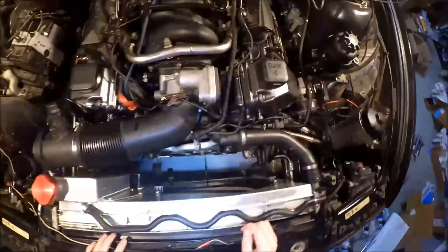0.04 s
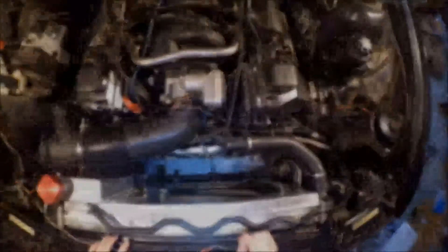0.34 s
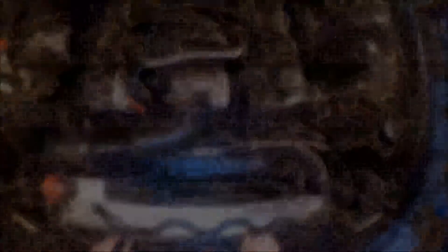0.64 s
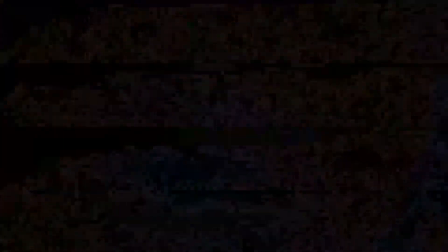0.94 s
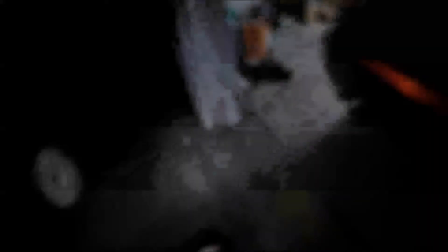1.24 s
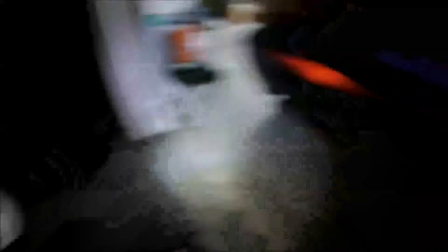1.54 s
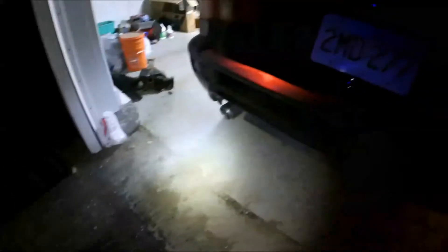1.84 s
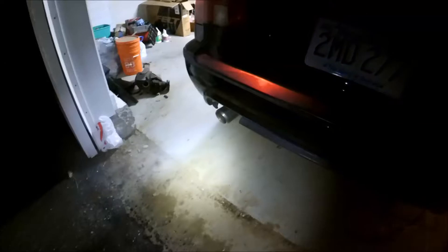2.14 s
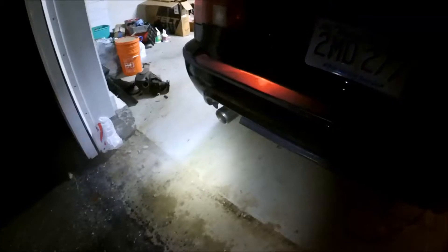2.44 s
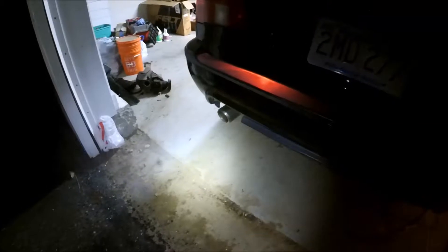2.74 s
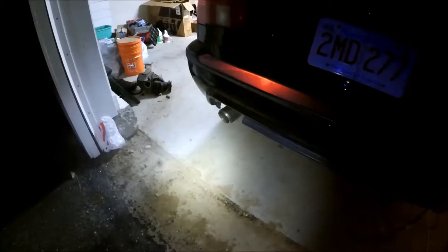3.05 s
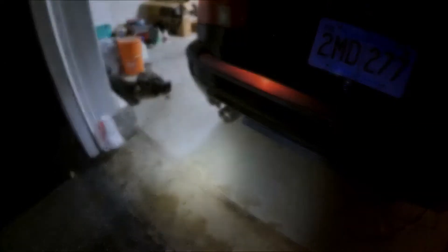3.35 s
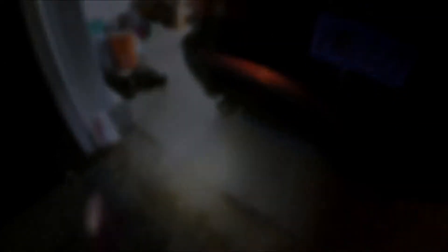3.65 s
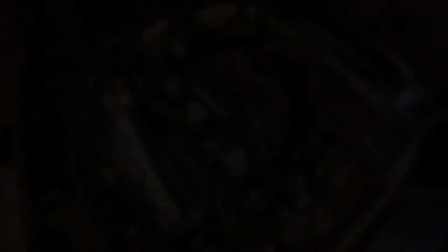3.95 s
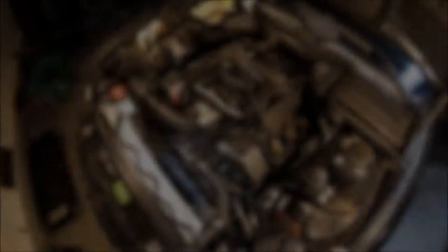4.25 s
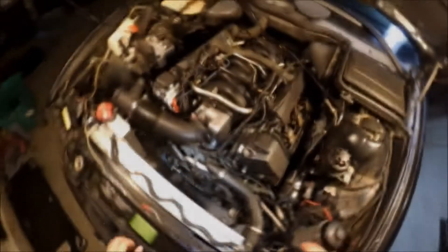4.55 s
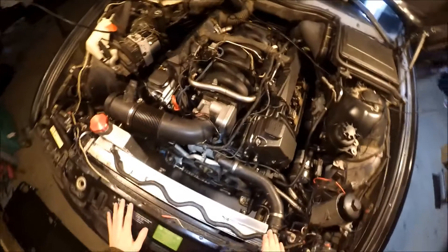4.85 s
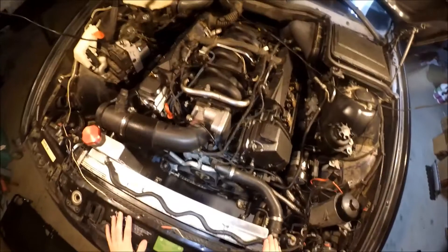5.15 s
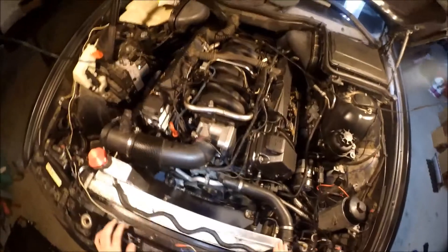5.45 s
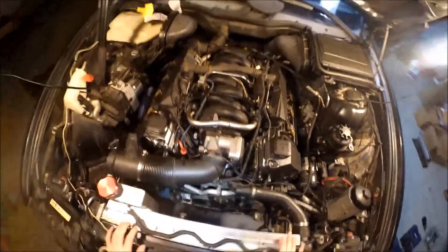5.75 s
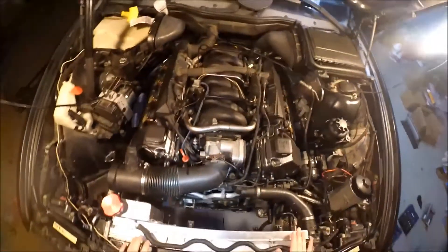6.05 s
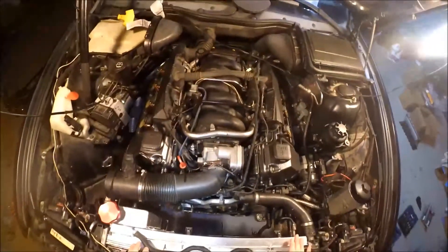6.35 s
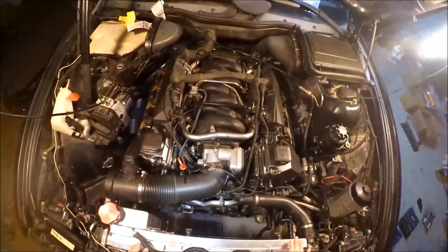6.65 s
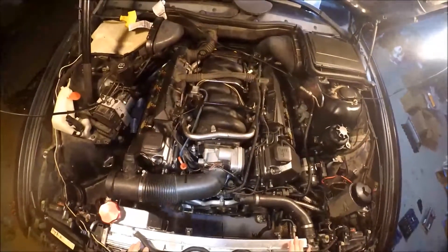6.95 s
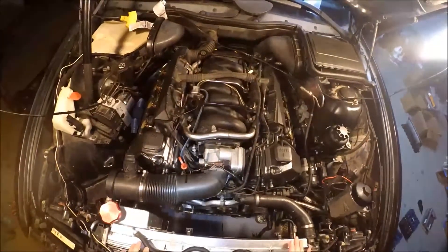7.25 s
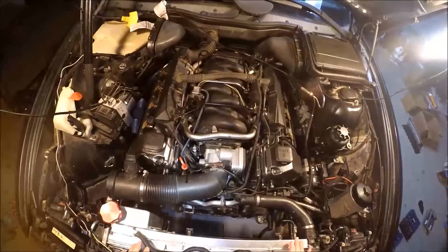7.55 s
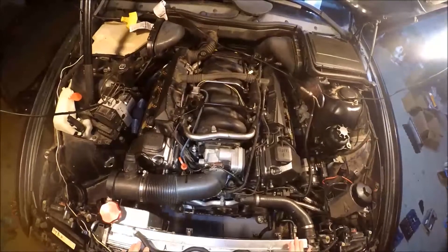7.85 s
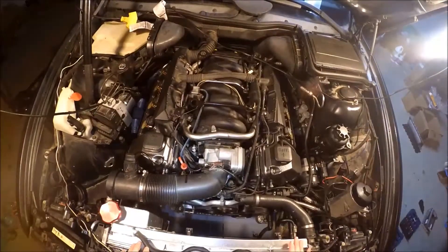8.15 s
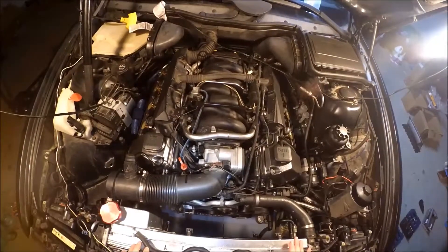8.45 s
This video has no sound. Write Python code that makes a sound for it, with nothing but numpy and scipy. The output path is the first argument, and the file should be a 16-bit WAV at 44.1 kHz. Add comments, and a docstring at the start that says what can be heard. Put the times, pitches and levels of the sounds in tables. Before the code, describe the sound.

A misfiring car engine idles, heard over the open hood, then at its chugging exhaust, then over the clicking valves again.

```python
"""A V8 engine with one weak cylinder idles in a garage; its uneven firings shake the block and exhaust.
Valves click as they strike, a loose tappet (a valve's pusher) ticks, and the belt and fan rush.
Three listening spots cut in and out and overlap: over the open engine bay at fast idle,
at the tailpipe, which chugs and stumbles once a cycle (two crank turns), and over the bay
again at slow idle, where the valves clatter and the tappet grows loud."""
import sys
import numpy as np
from scipy import signal
from scipy.fft import rfft, irfft, next_fast_len
from scipy.io import wavfile
from scipy.ndimage import map_coordinates

SR = 44100
rng = np.random.default_rng(int(sys.argv[2]) if len(sys.argv) > 2 else 0)


def unload_wav(signal):
    """Save mono or channel-first audio to the path in sys.argv[1] as 16-bit WAV at rate SR, clipped to [-1, 1]."""
    wavfile.write(
        sys.argv[1],
        SR,
        np.round(np.clip(np.atleast_2d(signal).T, -1, 1) * 32767).astype(np.int16),
    )


N = 379260

# the three listening spots: start_s, end_s, cycle_start_s (a moment when an engine cycle begins)
FAST, TAIL, SLOW = (0, 1.767, .1065), (.297, 4.775, .4459), (3.267, 8.7, 3.4524)
# how hard each cylinder fires, the weak one first: fast_gain, tailpipe_gain, slow_gain
CYLINDER_STRENGTHS = [(0.18, 0.0066, 0.0082), (0.41, 1.1, 0.39), (0.41, 0.65, 0.7), (0.35, 0.37, 0.7),
                      (0.5, 0.57, 0.24), (0.33, 0.36, 0.15), (0.58, 0.74, 0.97), (0.54, 0.23, 0.52)]
# tone colours (how strong each pitch is) of the valve parts: pitch_hz, level_db
CLICK_COLOUR = [(500, -24), (1500, -8.5), (3200, 2), (4500, -5), (5600, -0.5), (6800, 2.5), (7500, 2.5),
                (8300, 4.5), (8950, 6), (9230, 2.5), (9550, 0), (10300, -2.5), (12000, -8.5), (15500, -16)]  # a valve striking
KNOCK_COLOUR = [(600, -21), (1500, -16), (2000, -8), (2600, -5.5), (2800, -14), (3150, 0), (3260, 0),
                (3380, -0.5), (3550, -4.5), (3800, -6), (4080, -5), (4400, -7), (8000, -15.5), (15000, -15)]  # the cover over the valves
TAPPET_COLOUR = [(1000, -10), (3000, -11.5), (4600, -11.5), (4930, 4.5), (5050, -2), (5150, 4.5),
                 (5500, -14), (5950, 1), (6200, -7.5), (9000, -12.5), (15000, -39)]  # a ringing tappet
TICK_COLOUR = [(2500, -21), (3850, -11), (4020, -1.5), (4230, -1.5), (4400, -20), (9000, -46)]  # a lighter tick in one narrow band


def amp(db):
    """Turn decibels into a gain."""
    return 10 ** (np.asarray(db) / 20)


def unit(x):
    """Scale to an average (rms) level of 1."""
    return x / np.sqrt(np.mean(x ** 2) + 1e-20)


def clock():
    """The time of each sample in seconds."""
    return np.arange(N) / SR


def curve(points):
    """Join (time, value) points with straight lines."""
    return np.interp(clock(), *np.transpose(points))


def wobble(rate):
    """A wandering curve through rate random points a second."""
    points = rng.standard_normal(int(N * rate / SR) + 4)
    return map_coordinates(points, [clock() * rate], order=1)


def filtered(x, response):
    """Pass x through a filter given as a function of frequency."""
    size = next_fast_len(N + SR // 2)
    hz = np.fft.rfftfreq(size, 1 / SR)
    return irfft(rfft(x, size) * response(hz), size)[:N]


def resonate(x, modes):
    """Let x ring at several pitches; narrower ones ring longer."""
    def response(hz):
        return sum((-1) ** k * amp(db) * 1j * hz * width / (pitch ** 2 - hz ** 2 + 1j * hz * width)
                   for k, (pitch, width, db) in enumerate(modes))
    return filtered(x, response)


def tint(x, colour, ripple_db):
    """Give x a tone colour; random ripple stands for a metal part's many small resonances."""
    pitches, levels = np.transpose(colour)
    grid_hz = np.arange(0, SR / 2, 55)
    ripple = ripple_db * rng.standard_normal(len(grid_hz))

    def response(hz):
        db = np.interp(np.log(hz + 1), np.log(pitches), levels) + np.interp(hz, grid_hz, ripple)
        bass_cut = np.minimum(hz / pitches[0], 1) ** 2
        return unit(amp(db) * bass_cut)
    return filtered(x, response)


def noise(colour):
    """Steady noise with a tone colour."""
    return tint(rng.standard_normal(N), colour, ripple_db=1)


def ringing_noise(modes):
    """Noise ringing at the given pitches, as in a hollow space."""
    return unit(resonate(rng.standard_normal(N), modes))


def cycles(rpm, spot, sway=0, latest=0):
    """Count engine cycles; the uneven crank falls sway cycles behind at the place latest (0-1)."""
    count = np.cumsum(rpm) / (120 * SR)
    count -= np.interp(spot[2], clock(), count)
    return count - sway * np.cos(2 * np.pi * (count - latest))


def evenly(values, lag=0):
    """Space values evenly round the cycle, lag cycles late, as (place, value) rows."""
    return np.column_stack([np.arange(len(values)) / len(values) + lag, values])


def strokes(cycle, table):
    """Repeat (place in the cycle, value) rows every cycle; return their times and values."""
    laps = np.arange(np.floor(cycle[0]), np.ceil(cycle[-1]))
    rows = np.tile(np.asarray(table, float), (len(laps), 1))
    place = np.repeat(laps, len(table)) + rows[:, 0]
    inside = (place > cycle[0]) & (place < cycle[-1])
    return np.interp(place[inside], cycle, clock()), rows[inside, 1]


def impulses(times, sizes):
    """A train of single pushes."""
    samples = np.clip(np.round(times * SR).astype(int), 0, N - 1)
    return np.bincount(samples, sizes, N)


def heard(spot, fade_s=.008):
    """1 while a spot is heard: it cuts in at once and fades out quickly."""
    start_s, end_s, _ = spot
    return (clock() >= start_s) * np.clip((end_s - clock()) / fade_s + .5, 0, 1)


def distance(settle_s):
    """Falls from 1 towards 0 as the listener walks to the front of the bay at slow idle."""
    return np.exp(-np.maximum(clock() - SLOW[0], 0) / settle_s)


def hood_echo(x, far_s=.00142, near_s=.000586):
    """Add a reflection off the open hood; it comes sooner and weaker as the listener walks."""
    far = distance(settle_s=1.34)
    delay_s = near_s + (far_s - near_s) * far
    echo = map_coordinates(x, [(clock() - delay_s) * SR], order=3)
    gain = .12 * np.sqrt(far)
    return (x + gain * echo) / np.sqrt(1 + gain ** 2)


def snap(start_s, db, decay_s):
    """A sudden step in the sound, heard as a click."""
    age = clock() - start_s
    return amp(db) * (age >= 0) * np.exp(-np.abs(age) / decay_s)


def whine():
    """A thin electrical whine whose level wavers."""
    # its tones: pitch_hz, level_db
    tones = [(2003.3, -68), (4006.4, -73), (6010, -67)]
    return sum(amp(db + 1.2 * wobble(3.85)) * np.sqrt(2) * np.sin(2 * np.pi * hz * clock())
               for hz, db in tones)


def hum(rpm, per_cycle, db):
    """A slightly rough tone that follows the crank, probably from a belt-driven part."""
    phase = 2 * np.pi * per_cycle * np.cumsum(rpm) / (120 * SR) + .45 * wobble(45)
    return amp(db + 2.2 * wobble(30)) * np.sqrt(2) * np.sin(phase)


def sizzle():
    """A high flickering hiss, probably the belt, that fades as the listener walks."""
    # the band of the hiss: pitch_hz, width_hz, level_db
    band = [(9500, 1700, 0)]
    hiss = unit(ringing_noise(band) * amp(4.5 * wobble(350)))
    return amp(-49) * distance(settle_s=1.3) * hiss


def fast_rush():
    """Belt and fan noise at fast idle rings in the hollows of the bay."""
    # colour of the rush: pitch_hz, level_db
    colour = [(330, 0.5), (560, -1), (660, 2.5), (780, 0.5), (1030, -2.5), (1400, -0.5), (1960, -2.5),
              (3220, 1), (5700, -5), (7800, -5.5), (8650, -6), (9500, -6.5), (14700, -11.5), (15500, -16)]
    # the hollows: pitch_hz, width_hz, level_db
    hollows = [(435, 21, 4), (509, 23, 8), (643, 12, 4), (1123, 22, -3), (1440, 16, 1), (1530, 36, 6),
               (2520, 120, 1.5), (3500, 110, -1)]
    return amp(-39.5) * noise(colour) + amp(-48.5) * ringing_noise(hollows)


def distant_rush():
    """From behind the car the engine is a distant hiss."""
    # its colour: pitch_hz, level_db
    colour = [(150, -4), (250, -14.5), (398, -25), (434, -9), (482, -19), (544, -9), (583, -25.5),
              (717, -19), (781, -17.5), (1030, -23.5), (3160, -21.5), (4470, -27), (5220, -28), (8620, -26),
              (15500, -39)]
    return amp(-50.5) * noise(colour)


def slow_rush(pass_at_s=4.27, half_pass_s=.56):
    """Belt and fan noise swells and changes colour as the listener passes the side of the car."""
    # colour of the rush: pitch_hz, level_db
    colour = [(230, 2), (340, 1), (480, -2), (700, 1), (1000, -2.5), (1800, -3), (3200, -1), (5400, -6.5),
              (8800, -7), (10200, -14), (15500, -26)]
    # air ringing in the bay: pitch_hz, width_hz, level_db
    front_hollows = [(465, 31, 2), (638, 67, -4.5), (1270, 70, -9.5), (1545, 42, -12), (2670, 91, -10)]
    side_hollows = [(530, 53, 4.5), (700, 40, 2), (815, 42, -3), (2090, 160, -3)]
    low_boom = [(186, 32, 0)]
    beside = 1 / (1 + ((clock() - pass_at_s) / half_pass_s) ** 2)
    rush = amp(-49 + 3.5 * beside) * noise(colour)
    front = amp(-52.5) * ringing_noise(front_hollows) + amp(-57) * ringing_noise(low_boom)
    side = amp(-51.5) * ringing_noise(side_hollows)
    return rush + amp(-4 * beside) * front + beside * side


def rattle(cycle, hits, colour, rise_s):
    """Each hit (place in the cycle, level_db) is a gritty burst that swells and dies away."""
    times, levels_db = strokes(cycle, hits)
    sizes = amp(levels_db + .7 * rng.standard_normal(len(times)))
    rises = np.arange(SR // 8) / SR / rise_s
    swell = (rises * np.exp(1 - rises)) ** 3
    power = signal.fftconvolve(impulses(times, sizes ** 2), swell)[:N]
    grit = unit(rng.standard_normal(N) * amp(2.2 * wobble(1500)))
    return tint(np.sqrt(np.abs(power)) * grit, colour, ripple_db=1.7)


def tap(cycle, places, levels_db, colour, decay_s, alike):
    """A valve strikes and bounces once; the share alike (0-1) of its power is the same each time."""
    contact_s, bounce_s, bounce_db = .0005, .0042, -1
    age = np.arange(SR // 12) / SR

    def contact(delay_s):
        since = np.maximum(age - delay_s, 0)
        return (1 - np.exp(-since / contact_s)) * np.exp(-since / decay_s)
    shape = np.sqrt(contact(0) + amp(bounce_db) ** 2 * contact(bounce_s))
    taps = np.zeros(N + len(age))
    for place, db in zip(places, levels_db):
        own_grit = rng.standard_normal(len(age))
        for start_s in strokes(cycle, [(place, db)])[0]:
            burst = np.sqrt(alike) * own_grit + np.sqrt(1 - alike) * rng.standard_normal(len(age))
            start = int(start_s * SR)
            taps[start:start + len(age)] += amp(db + .7 * rng.standard_normal()) * shape * burst
    return tint(taps[:N], colour, ripple_db=1)


def distant_tappet(cycle):
    """Behind the car, the garage smears the loose tappet's tick into a soft swish."""
    # its colour: pitch_hz, level_db
    colour = [(1500, -20), (3100, -0.5), (4400, -6), (5250, 2.5), (6000, -9), (9000, -5), (15000, -25)]
    return rattle(cycle, [(.53, -55)], colour, rise_s=.043)


def pipe_rattle(cycle):
    """Something on the exhaust pipe rings once a cycle."""
    # its colour: pitch_hz, level_db
    colour = [(700, -22), (810, 7), (900, 3), (1050, -36), (3000, -40)]
    return rattle(cycle, [(.846, -57)], colour, rise_s=.011)


def valve_hits(lead, swing_db, loudest):
    """One hit lead cycles before each firing, louder at the near end of the engine."""
    place = np.arange(len(CYLINDER_STRENGTHS)) / len(CYLINDER_STRENGTHS) - lead
    return np.column_stack([place, swing_db * np.cos(2 * np.pi * (place - loudest))])


def fast_valves(cycle):
    """Valves click, knock their cover and close with a finer click; two ticks come once a cycle."""
    click_hits = valve_hits(lead=.031, swing_db=1.5, loudest=.59)
    knock_hits = valve_hits(lead=.016, swing_db=9.5, loudest=.22)
    closing_hits = valve_hits(lead=.0633, swing_db=9, loudest=.23)
    clicks = amp(-41.5) * rattle(cycle, click_hits, CLICK_COLOUR, rise_s=.0037)
    knocks = amp(-45) * rattle(cycle, knock_hits, KNOCK_COLOUR, rise_s=.0021)
    closings = amp(-44) * rattle(cycle, closing_hits, CLICK_COLOUR, rise_s=.00087)
    loose_tappet = rattle(cycle, [(.4, -44.5)], TAPPET_COLOUR, rise_s=.012)
    light_tick = rattle(cycle, [(.07, -47)], TICK_COLOUR, rise_s=.0062)
    return clicks + knocks + closings + loose_tappet + light_tick


def slow_valves(cycle):
    """Valves strike with crisp double clicks; knocks, ticks and tappets grow as the listener nears."""
    # when each stroke lands: place_in_cycle (0-1)
    places = np.array([.092, .212, .337, .46, .585, .725, .854, .91, .985])
    # how hard each stroke sounds: click_db, knock_db, tick_db
    levels = [(-36.5, -42, -53), (-40.5, -42.5, -64), (-40.5, -42.5, -48.5), (-43.5, -45.5, -67),
              (-40, -44.5, -56), (-45.5, -40.5, -45), (-41.5, -41.5, -62), (-46, -54, -62),
              (-39.5, -40, -60)]
    click_db, knock_db, tick_db = np.transpose(levels)
    cover_lag = .008  # the cover answers this many cycles late
    clicks = tap(cycle, places, click_db, CLICK_COLOUR, decay_s=.0036, alike=.44)
    knocks = tap(cycle, places + cover_lag, knock_db, KNOCK_COLOUR, decay_s=.0037, alike=.58)
    ticks = tap(cycle, places, tick_db, TICK_COLOUR, decay_s=.0031, alike=.7)
    tappets = tap(cycle, places, click_db - 15, TAPPET_COLOUR, decay_s=.0058, alike=.5)
    loose_tappet = tap(cycle, [.095], [-37.5], TAPPET_COLOUR, decay_s=.0051, alike=.78)
    far = distance(settle_s=.66)
    clatter = hood_echo(amp(.5 * far) * clicks) + amp(-10.5 * far) * (knocks + ticks)
    return clatter + amp(-10.5 * distance(settle_s=2.5)) * (tappets + loose_tappet)


def firing(cycle, firings, body, scatter_db, cutoff_hz):
    """Each cylinder sends a pressure pulse that rings the body; unequal pulses make the idle limp."""
    times, strength = strokes(cycle, firings)
    size_error, time_error = rng.standard_normal((len(times), 2)).T
    gap_samples = np.mean(np.diff(times)) * SR
    sizes = strength * amp(scatter_db * size_error) * gap_samples
    pulses = impulses(times + .00012 * time_error, sizes)
    softened = filtered(pulses, lambda hz: 1 / (1 + (hz / cutoff_hz) ** 4))
    return resonate(softened, body)


def gas_puffs(cycle):
    """Each firing leaves the tailpipe as a puff of gas that rings the pipe's tip."""
    # each cylinder's puff: level_db
    puffs_db = [-1.5, -18, -17, 3.5, 1.5, 2.5, -3.5, 2.5]
    # the ringing tip: pitch_hz, width_hz, level_db
    tip_modes = [(438, 29, -63), (533, 26, -68.5), (660, 36, -75.5)]
    # colour of the rushing gas: pitch_hz, level_db
    gas_colour = [(280, -10), (350, 3), (440, -10), (540, 2), (680, -4), (820, -2.5), (1100, -29),
                  (3000, -25.5)]
    tip = firing(cycle, evenly(amp(puffs_db), lag=.0055), tip_modes, scatter_db=1.2, cutoff_hz=1500)
    gas = rattle(cycle, evenly(puffs_db, lag=-.0039), gas_colour, rise_s=.0034)
    return tip + amp(-56.5) * gas


def fast_bay():
    """Fast idle over the bay: firings shake the engine, and the rush nearly covers the valves."""
    # what the firings shake: pitch_hz, width_hz, level_db
    body = [(14.1, 8.8, -12), (38.2, 27.4, -21.5), (84.6, 8.4, -21.5), (137.7, 24, -34),
            (206.5, 15.3, -37.5), (273, 60, -51), (303.2, 4.5, -34), (447, 13, -61), (633, 16, -56)]
    start_rpm, drift_rpm_per_s, swing_rpm, period_s, crest_s = 1005, 3, 6.8, 2.013, 1.8
    swing = swing_rpm * np.cos(2 * np.pi * (clock() - crest_s) / period_s)
    rpm = start_rpm + drift_rpm_per_s * clock() + swing
    cycle = cycles(rpm, FAST, sway=.0066, latest=.17)
    strength = np.transpose(CYLINDER_STRENGTHS)[0]
    throb = firing(cycle, evenly(strength), body, scatter_db=2.7, cutoff_hz=1200)
    return throb + fast_valves(cycle) + fast_rush() + hum(rpm, per_cycle=54.6, db=-51)


def tailpipe():
    """Exhaust pulses boom in the pipe and stumble at the weak cylinder."""
    # the ringing pipe and muffler: pitch_hz, width_hz, level_db
    pipe = [(12.7, 3.92, -17), (41.8, 6.3, -17), (49.74, 10.74, -14), (49.46, 4.1, -10.5), (68, 4.3, -30.5),
            (91.3, 37.3, -33), (116.85, 6.6, -31), (168.8, 4.8, -45), (215.25, 5, -38.5),
            (217.3, 13.1, -36.0), (220, 47, -46.5), (315.8, 5.1, -52)]
    # the idle sags and recovers: time_s, speed_rpm
    speeds = [(0.3, 834.3), (1.2, 830.9), (1.55, 832.7), (1.8, 840.8), (2.1, 813.3), (2.5, 830.4),
              (3.05, 819.6), (3.55, 834.5), (3.85, 827.6), (4.1, 840.1), (4.45, 814.9), (4.75, 836.4)]
    rpm = curve(speeds)
    cycle = cycles(rpm, TAIL, sway=.0093, latest=.17)
    strength = np.transpose(CYLINDER_STRENGTHS)[1]
    chug = firing(cycle, evenly(strength, lag=.0403), pipe, scatter_db=1.04, cutoff_hz=785)
    exhaust = chug + gas_puffs(cycle) + pipe_rattle(cycle)
    return exhaust + distant_tappet(cycle) + hum(rpm, per_cycle=63, db=-60.5) + distant_rush()


def slow_bay():
    """Slow idle over the bay: firings shake the engine under the clatter of the valves."""
    # what the firings shake: pitch_hz, width_hz, level_db
    body = [(10.46, 21.34, -14), (19.3, 17.48, -13), (52.1, 5.3, -35.5), (81, 6.9, -31),
            (95.17, 4.7, -32.5), (104.5, 7, -34.5), (139.2, 8.1, -42.5), (145.3, 45, -46),
            (167.3, 22, -52.5)]
    # the idle sags and recovers: time_s, speed_rpm
    speeds = [(3.3, 719.4), (3.8, 741.5), (4.3, 729.7), (4.8, 731.5), (5.25, 730.6), (5.6, 732.8),
              (5.9, 720.7), (6.1, 712.3), (6.4, 727.9), (6.7, 731.9), (7.0, 721.2), (7.25, 717.4),
              (7.55, 725.0), (7.9, 732.3), (8.25, 730.4), (8.6, 703.8)]
    rpm = curve(speeds)
    uneven_cycle = cycles(rpm, SLOW, sway=.012, latest=.848)
    strength = np.transpose(CYLINDER_STRENGTHS)[2]
    throb = firing(uneven_cycle, evenly(strength, lag=-.0281), body, scatter_db=1, cutoff_hz=600)
    return throb + slow_valves(cycles(rpm, SLOW)) + slow_rush() + hood_echo(sizzle()) + whine()


def scene():
    """The three spots laid over one another; the later two cut in with a click."""
    engine = heard(FAST) * fast_bay() + heard(TAIL) * tailpipe() + heard(SLOW) * slow_bay()
    to_tail = snap(TAIL[0], db=-34, decay_s=.0034)
    to_bay = snap(SLOW[0], db=-32, decay_s=.0016)
    return (engine + to_bay - to_tail)[None]


def record(dry):
    """Cut off the very highest treble."""
    return filtered(dry[0], lambda hz: hz < 15600)[None]


dry = scene()
out = record(dry)
unload_wav(out)
```